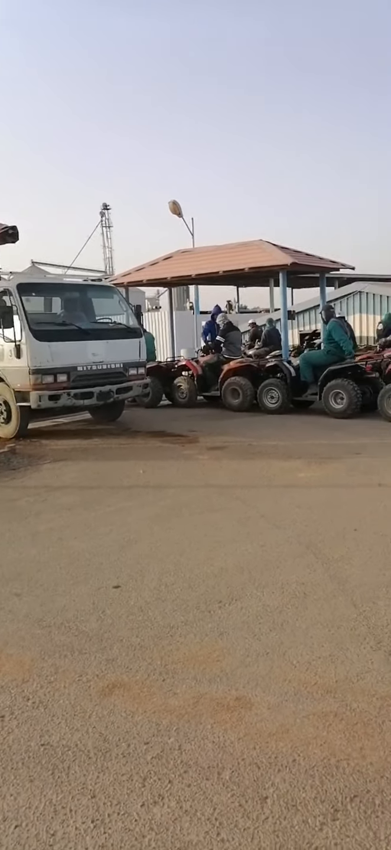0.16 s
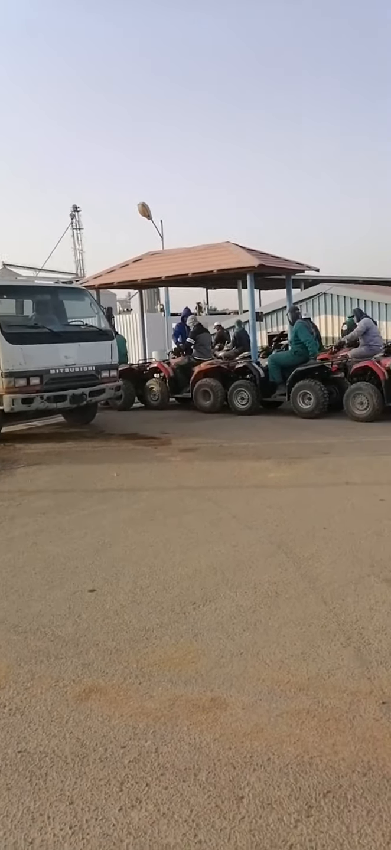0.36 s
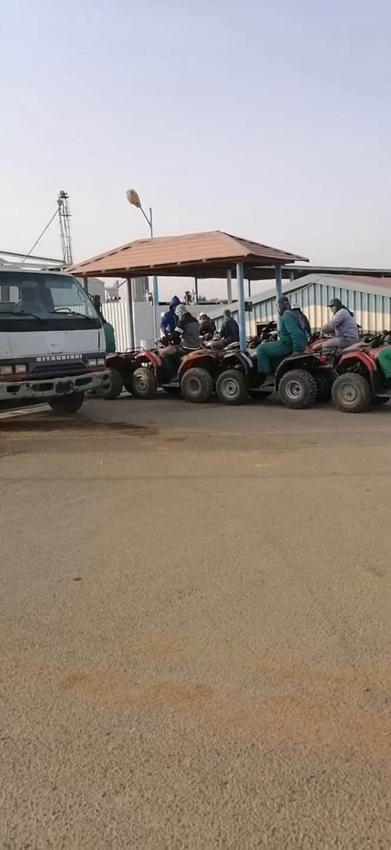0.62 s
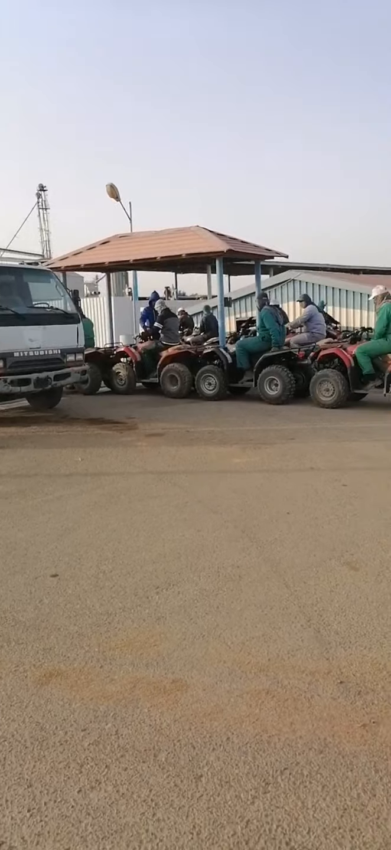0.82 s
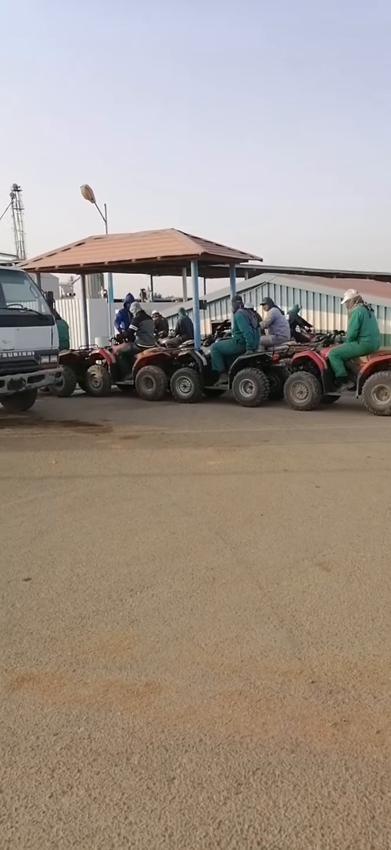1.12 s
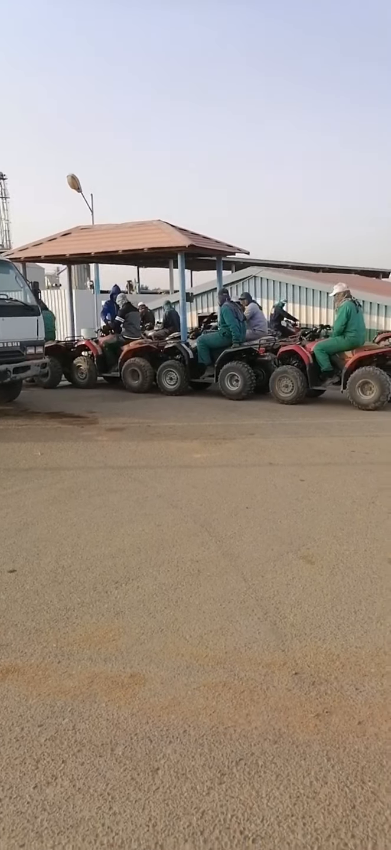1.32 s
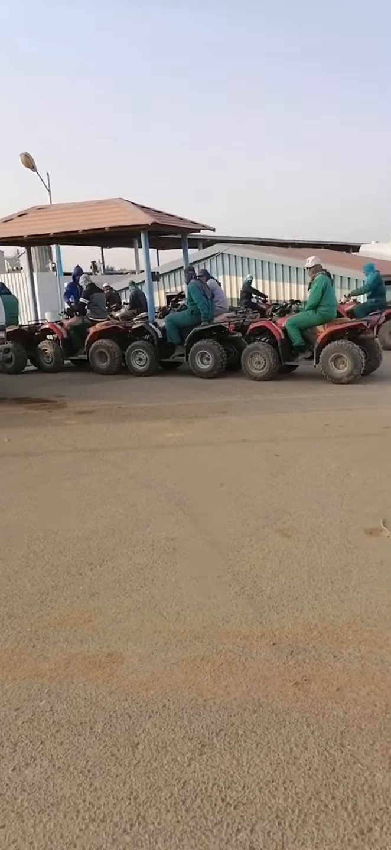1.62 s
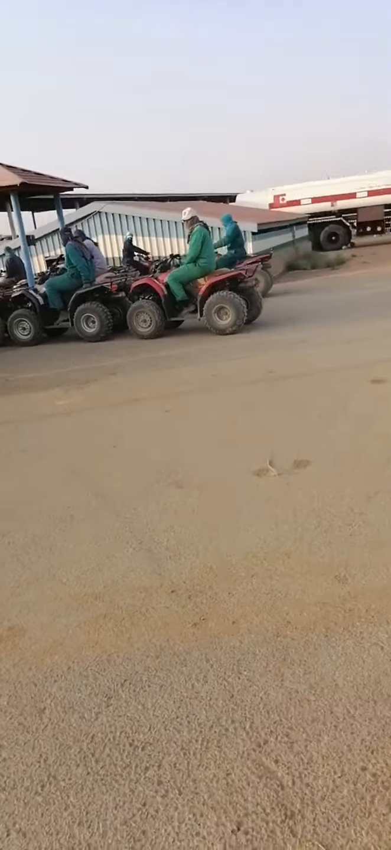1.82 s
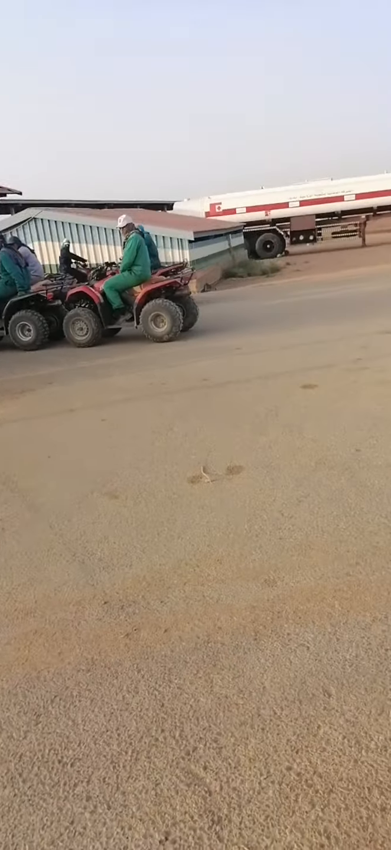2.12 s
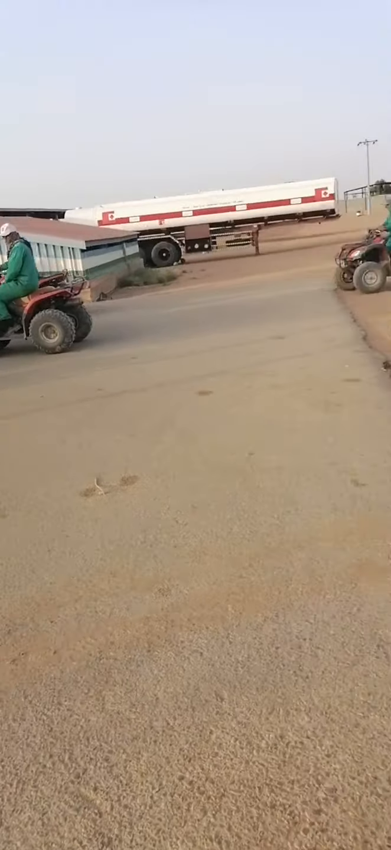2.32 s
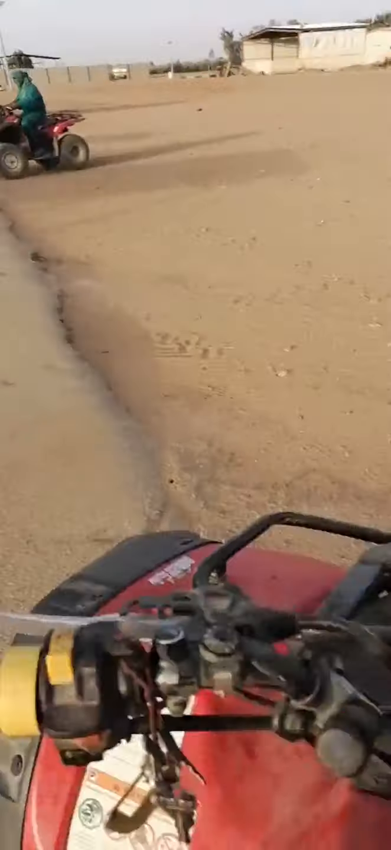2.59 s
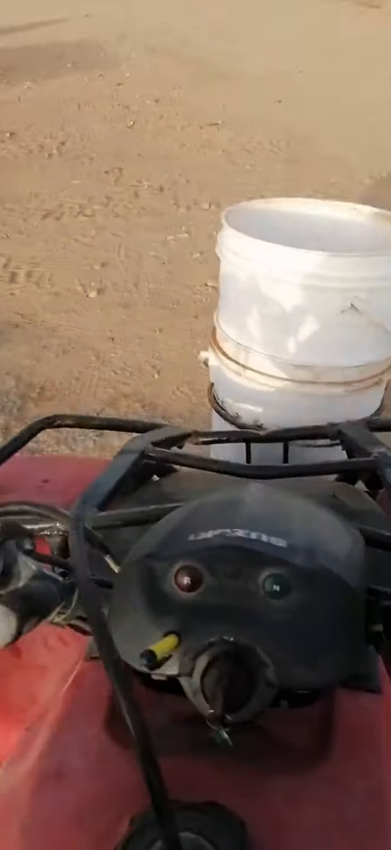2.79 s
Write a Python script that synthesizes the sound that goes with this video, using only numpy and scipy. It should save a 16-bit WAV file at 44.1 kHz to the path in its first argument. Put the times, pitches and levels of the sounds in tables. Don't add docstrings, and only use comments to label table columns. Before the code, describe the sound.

Close single-cylinder quad engine in an open yard: low rapid exhaust putter with valve chirps, a sagging lumpy idle, then a stronger steady throb with loose metal jingle and tappet clatter, other engines droning faintly behind.

```python
import sys
import numpy as np
from scipy import signal
from scipy.io import wavfile

SR = 44100
rng = np.random.default_rng(int(sys.argv[2]) if len(sys.argv) > 2 else 0)


def gain_from_decibels(decibels):
    exponent = np.asarray(decibels, float) / 20
    return 10 ** exponent


def wav_record(signal):
    frames = np.transpose(np.atleast_2d(signal))
    bounded = np.clip(frames, -1, 1)
    quanta = np.round(bounded * 32767).astype(np.int16)
    wavfile.write(sys.argv[1], SR, quanta)


N = 130095
T = np.arange(N) / SR
RIGHT_LAG_S = 0.0003857

# time in seconds, blow strength in dB, gas warmth as a pitch factor.
THROTTLE = [(0, -21, 0.99), (.3, -20.5, 1.085), (.75, -21.5, 1.016), (1.03, -24, 0.9), (1.1, -28.5, 0.84),
            (1.28, -31, 0.9), (1.4, -24.5, 0.85), (1.6, -30, 0.82), (1.7, -28.5, 1.04), (1.8, -21.5, 0.9),
            (1.92, -22, 0.986), (2.15, -19, 0.964), (2.5, -17, 1.015), (2.63, -17.5, 0.98),
            (2.95, -14.5, 1.017)]
# pitch in Hz, level in dB, t60 in seconds.
CRANKCASE = [(1920, 1, 0.022), (2174, -3.5, 0.028), (2880, -7.5, 0.015), (3335, -5, 0.02),
             (3880, -6, 0.011)]
# pitch in Hz, difference in dB.
LEFT_OVER_RIGHT_DB = [(40, -3.5), (380, 4.5), (1290, 1.5), (2380, 2.5), (4000, 0), (5500, 7.5), (8120, 5),
                      (15000, 16)]


def in_time(rows):
    s, *columns = np.transpose(rows)
    return [np.interp(T, s, c) for c in columns]


def at_hz(points, hz):
    table_hz, value = np.transpose(points)
    return np.interp(np.log(hz), np.log(table_hz), value)


def rms_one(x):
    return x / np.sqrt(np.mean(x ** 2) + 1e-20)


def drift(rate):
    r = np.exp(-80 * np.pi * rate / SR)
    slow = signal.lfilter([1], [1, -2 * r, r * r], rng.standard_normal(N // 40 + 2002))[2000:]
    return np.interp(np.arange(N) / 40, np.arange(len(slow)), rms_one(slow))


def ring(clicks, hz, t60):
    r, w = gain_from_decibels(-60 / (t60 * SR)), 2 * np.pi * hz / SR
    return signal.lfilter([0, np.sin(w)], [1, -2 * r * np.cos(w), r * r], clicks + 1e-18)


def band(x, low_hz, high_hz, order):
    return signal.sosfilt(signal.butter(order, [low_hz, high_hz], "band", fs=SR, output="sos"), x)


def place(x, hz):
    tilt_db = at_hz(LEFT_OVER_RIGHT_DB, hz) / 2
    late = np.interp(T - RIGHT_LAG_S, T, x)
    return np.array([gain_from_decibels(tilt_db) * x, gain_from_decibels(-tilt_db) * late])


def banded_noise(spectrum, patchy_db, per_octave):
    # pitch in Hz, left-right likeness from 0 to 1.
    likeness = [(30, .2), (100, 1), (500, 0.77), (950, 0.079), (5000, 0.013), (15000, 0.02)]
    out, together, lag = 0, drift(2.13), int(RIGHT_LAG_S * SR)
    lowest, highest = spectrum[0][0], spectrum[-1][0]
    edges = lowest * 2 ** np.arange(0, np.log2(highest / lowest) + .1, 1 / per_octave)
    white = rng.standard_normal((2, 2, N))
    for k, (low, high) in enumerate(zip(edges, edges[1:])):
        shared, own = band(white[k % 2], low, high, 2)
        hz = np.sqrt(low * high)
        alike = np.clip(at_hz(likeness, hz), 0, 1)
        tilt_db = at_hz(LEFT_OVER_RIGHT_DB, hz) / 2
        gain = gain_from_decibels(at_hz(spectrum, hz) + patchy_db * (0.5 * together + drift(29.0)))
        right = np.sqrt(alike) * np.roll(shared, lag) + np.sqrt(1 - alike) * own
        out = out + gain * np.array([gain_from_decibels(tilt_db) * shared, gain_from_decibels(-tilt_db) * right])
    return rms_one(out)


def crank():
    # time in seconds, firings per second.
    firing_speed = [(0.0, 17.295), (0.28, 18.931), (0.6, 18.64), (0.8, 16.211), (1.0, 13.859),
                    (1.15, 11.875), (1.3, 10.118), (1.45, 10.105), (1.6, 8.485), (1.68, 11.246),
                    (1.74, 13.191), (1.86, 15.167), (2.0, 16.242), (2.15, 16.595), (2.4, 16.685),
                    (2.6, 17.365), (2.95, 17.597)]
    first_s = -.0059
    rate, = in_time(firing_speed)
    turns = np.cumsum(rate) / SR - first_s * rate[0]
    count = np.arange(1, int(turns[-1]) + 1)
    return turns, np.r_[first_s, np.interp(count, turns, T)]


def throb(turns, at, depth_db):
    return gain_from_decibels(depth_db * (np.cos(2 * np.pi * (turns - at)) - 1.5))


def exhaust(firings):
    # pitch in Hz, left level in dB, right level in dB, rise in cycles, hold in seconds, t60 in seconds,
    # delay in seconds, share of the throttle followed, spread from firing to firing in dB.
    chambers = [(98, -13, -20, 2.09, 0.021, 0.13, 0.00055, 0.4, 1.5),
                (272.9, -14, -24.5, 0.97, 0.017, 0.04, 0.003115, 0.95, 1.1),
                (209.6, -29, -35.5, 1.3, 0.0087, 0.11, 0.003, 0.41, 5),
                (458.7, -34.5, -48, 1, 0.011, 0.077, 0.00304, 0.64, 5.5),
                (343.5, -31, -43, 1.04, 0.0095, 0.074, 0.0037, 0.68, 4),
                (45.8, -35.5, -39, 1.4, 0.018, 0.31, 0.00054, 0.29, 3.5),
                (103.5, -27, -32.5, 1.34, 0.023, 0.13, 0.03066, 0.32, 4.5),
                (288, -33, -43, 2, 0.016, 0.043, .027, 0.78, 4)]
    early_cycles = 0.46
    s, load_db, warmth = np.transpose(THROTTLE)
    pad, span = SR // 10, np.arange(SR // 5)
    out = np.zeros((2, N + SR))
    luck = rng.standard_normal((len(firings), len(chambers), 2))
    for at, draws in zip(firings, luck):
        start = int(at * SR) - pad // 10
        blow_db, warm = np.interp(at, s, load_db) + 17, np.interp(at, s, warmth)
        for chamber, (level_luck, pitch_luck) in zip(chambers, draws):
            hz, left_db, right_db, cycles, hold, t60, delay, follows, spread_db = chamber
            level_db = follows * blow_db + spread_db * level_luck
            pitch = hz * warm * (1 + 0.0064 * spread_db * pitch_luck)
            glide_per_s = 2.5 if hz > 250 else -1.5
            for side, db in enumerate((left_db, right_db)):
                t = (start + span) / SR - at - delay - side * RIGHT_LAG_S
                rise = np.sin(np.pi / 2 * np.clip((t * hz + early_cycles) / cycles, 0, 1)) ** 2
                fall_db = -60 * np.maximum(t - hold, 0) / t60
                bend = 1 + glide_per_s * np.clip(t - hold, -hold, .06) / 2
                tone = np.sin(2 * np.pi * pitch * t * bend)
                out[side, pad + start + span] += gain_from_decibels(db + level_db + fall_db) * rise * tone
    return out[:, pad:pad + N]


def valve():
    # time in seconds, peak in dB.
    leaks = [(0.011, -37.5), (0.0686, -35), (0.1245, -38), (0.1789, -38), (0.2332, -38), (0.2856, -35),
             (0.3395, -35), (0.393, -36), (0.4292, -40), (0.4459, -38), (0.4987, -34.5), (0.552, -38),
             (0.6057, -34), (0.6608, -32.5), (0.7167, -35), (0.7755, -38), (0.8369, -43), (0.9017, -47),
             (0.9696, -43), (1.043, -40.5), (1.1203, -50), (1.203, -41.5), (1.2946, -46), (1.3622, -44),
             (1.3934, -37), (1.495, -44), (1.6007, -48), (1.7019, -41), (1.7608, -44), (1.8532, -42),
             (2.4069, -51), (2.5814, -44), (2.6334, -45), (2.8155, -49)]
    # pitch in Hz, level in dB, t60 in seconds.
    whistles = [(5390, 0, .012), (5910, -10, .006), (7070, -7, .004), (8000, -17, .003)]
    hold_s, tail_s, tail_db = 0.0043, 0.012, -9.5
    puff = np.zeros(N)
    for s, db in leaks:
        part = slice(int(s * SR) - 50, int(s * SR) + SR // 8)
        since = np.maximum(T[part] - s + .001, 0)
        opening = np.clip(since / 0.001, 0, 1)
        closing = np.exp(-(since / hold_s) ** 2) + gain_from_decibels(tail_db) * np.exp(-since / tail_s)
        puff[part] += gain_from_decibels(db - 0.5) * opening * closing
    out = 0
    for hz, db, t60 in whistles:
        rough = 1 + .25 * drift(250)
        even = 2 * (1 - gain_from_decibels(-60 / (t60 * SR)))
        whistle = np.sin(2 * np.pi * hz * T + 1.45 * drift(9.4))
        out = out + place(gain_from_decibels(db) * even * ring(puff * rough * whistle, hz, t60), hz)
    return out


def engine_hiss(turns, near_db):
    # pitch in Hz, level in dB per Hz.
    hiss_bands = [(4300, -21), (4800, -27), (5300, 1.5), (6200, -2), (7100, 3), (8000, -8.5), (9000, -11.5),
                  (11000, -21.5)]
    gain = gain_from_decibels(near_db + 5) * throb(turns, 0.32, 1.5)
    return gain * banded_noise(hiss_bands, patchy_db=2.5, per_octave=4.86)


def grit_sizzle(grit_db):
    # pitch in Hz, level in dB per Hz.
    sizzle_bands = [(8800, -1), (10000, 0.5), (11200, -16.5), (13000, -8), (14300, -1.5), (15900, -1.5)]
    return gain_from_decibels(grit_db) * banded_noise(sizzle_bands, patchy_db=6.0, per_octave=7.24)


def clatter(turns, engine_db):
    struck = rng.random(N) < 1200 / SR
    ticks = struck * gain_from_decibels(4.8 * np.minimum(rng.exponential(1, N), 3.5)) * rng.choice([-1, 1], N)
    ticks = ticks * throb(turns, 0.43, 3)
    out = 0
    for hz, db, t60 in CRANKCASE:
        twin = ring(ticks, 1.03 * hz, t60) * np.array([[.7], [.5]])
        out = out + gain_from_decibels(db) * (place(ring(ticks, hz, t60), hz) + twin)
    return gain_from_decibels(engine_db) * rms_one(out)


def roar(turns, effort_db):
    # pitch in Hz, level in dB per Hz.
    fan_bands = [(450, -8.5), (800, -2), (1200, -7.5), (1600, -8.5), (2400, -10), (3200, -14.5),
                 (3800, -19.5), (4600, -21.5)]
    gain = gain_from_decibels(-42.5 + 0.42 * effort_db) * throb(turns, 0.22, 1.75)
    return gain * banded_noise(fan_bands, patchy_db=1.5, per_octave=3.005)


def low_drone(turns, effort_db):
    # pitch in Hz, level in dB per Hz.
    drone_bands = [(25, -25), (50, -22.5), (100, 3), (155, -10.5), (270, -9), (420, -18.5), (700, -28)]
    gain = gain_from_decibels(-30 + 0.38 * effort_db) * throb(turns, 0.1, 0.25)
    return gain * banded_noise(drone_bands, patchy_db=1.5, per_octave=3)


def wind():
    low = band(rng.standard_normal((2, N + SR)), 22, 48, 4)[:, SR:]
    return gain_from_decibels(-45 + 1.6 * drift(4.0)) * rms_one(low) * gain_from_decibels(np.array([[1.5], [-1.5]]))


def crunches():
    # start in seconds, length in seconds, peak in dB, lowest Hz, highest Hz.
    burst_events = [(1.322, 0.018, -39.5, 1700, 4000), (1.322, 0.017, -39.5, 4430, 7400),
                    (1.330, 0.017, -40, 6200, 7400), (1.331, .006, -55, 8500, 13000),
                    (1.708, .016, -43, 5100, 6900), (1.7193, 0.011, -36, 5200, 7500),
                    (1.4, .008, -50, 2000, 3800), (1.719, .008, -61, 8500, 15000),
                    (1.437, .002, -53, 6500, 15500), (1.983, .004, -53, 11000, 18000),
                    (1.363, 0.013, -54, 13400, 14100), (1.887, 0.016, -41.5, 440, 800),
                    (1.95, 0.022, -37.5, 560, 920), (2.016, 0.015, -32, 470, 1370),
                    (1.769, 0.015, -45.5, 1600, 3800), (1.841, 0.016, -45, 1500, 5800),
                    (1.905, .02, -47, 1800, 5500), (2.031, .02, -44, 1500, 3500),
                    (1.681, .025, -54, 1950, 2500), (1.508, 0.02, -46.5, 1700, 1900),
                    (.607, .005, -56, 6000, 13000), (1.15, 0.018, -47, 770, 880)]
    out, t = 0, T[:SR // 5]
    for s, length, db, low_hz, high_hz in burst_events:
        rise = np.clip(t / (0.055 * length), 0, 1)
        fall = gain_from_decibels(-15 * np.clip(t / length, 0, 20) ** 2)
        burst = band(rng.standard_normal(len(t)) * rise * fall + 1e-18, low_hz, high_hz, 4)
        burst = np.r_[np.zeros(int(s * SR)), burst, np.zeros(N)][:N]
        out = out + place(gain_from_decibels(db + 8) * burst / np.abs(burst).max(), np.sqrt(low_hz * high_hz))
    return out


def jingle():
    # time in seconds, peak in dB.
    touches = [(1.821, -49), (1.9819, -63), (2.0143, -61), (2.0474, -46), (2.1041, -54), (2.1311, -43),
               (2.1685, -53), (2.193, -42.5), (2.2425, -40.5), (2.2872, -44), (2.3206, -45), (2.351, -46),
               (2.373, -62), (2.4094, -47), (2.4918, -64), (2.5382, -52), (2.61, -65), (2.7023, -55.5),
               (2.7941, -62), (2.847, -61), (2.87, -42.5), (2.9003, -48)]
    # pitch in Hz, level in dB, t60 in seconds.
    buckle_modes = [(9640, 0, .04), (13780, -6, .035), (14600, -10, .03), (15300, -9, .025),
                    (10900, -13, .015)]
    s, db = np.transpose(touches)
    luck, out = rng.standard_normal((len(s), len(buckle_modes))), 0
    shaking = (T > 1.95) * (T < 2.56) * gain_from_decibels(-62.5 + 3.7 * drift(13.0))
    for (hz, mode_db, t60), draws in zip(buckle_modes, luck.T):
        clicks = shaking * (rng.random(N) < 260 / SR) * rng.standard_normal(N)
        clicks[(s * SR).astype(int)] = gain_from_decibels(db + 1.0 + 2.2 * draws)
        pair = ring(clicks, hz, t60) + ring(clicks, 1.006 * hz, t60)
        out = out + place(gain_from_decibels(mode_db) * pair / 2, hz)
    return out


def squeaks():
    # start in seconds, length in seconds, peak in dB, first Hz, last Hz.
    far_squeaks = [
        (1.827, 0.051, -49.5, 1240, 1213),
        (2.019, 0.076, -45, 1030, 1154),
    ]
    out = 0
    for s, length, db, from_hz, to_hz in far_squeaks:
        along = np.clip((T - s) / length, 0, 1)
        hz = from_hz + (to_hz - from_hz) * along
        out = out + gain_from_decibels(db) * np.sin(np.pi * along) * np.sin(2 * np.pi * np.cumsum(hz) / SR)
    return out


def knocks():
    # time in seconds, peak in dB, upper modes in dB.
    tappet_knocks = [(2.3147, -46, -14), (2.3366, -40, -16), (2.4015, -41, -17), (2.4509, -41, -12),
                     (2.5113, -39, -11), (2.5322, -35.5, -3), (2.5904, -34, -16), (2.6474, -36, -21),
                     (2.6995, -37, -22), (2.7053, -31, -25), (2.7477, -39, -18), (2.7615, -37, -19),
                     (2.805, -39, -9), (2.819, -27.5, -10), (2.8629, -29, -9.5), (2.8769, -25, -6.5),
                     (2.9174, -35, -15), (2.9318, -30, -9)]
    rebound_s, rebound_db = .009, -5
    s, db, upper_db = np.transpose(tappet_knocks)
    luck, out = rng.standard_normal((len(s), len(CRANKCASE), 2)), 0
    for k, (hz, mode_db, t60) in enumerate(CRANKCASE):
        clicks = np.zeros(N + SR)
        level_db = db - 5 + mode_db + (upper_db + 12.5) * (k > 1)
        clicks[(s * SR).astype(int)] = gain_from_decibels(level_db + 2.4 * luck[:, k, 0])
        clicks[((s + rebound_s) * SR).astype(int)] = gain_from_decibels(level_db + rebound_db + 3.3 * luck[:, k, 1])
        out = out + place(ring(clicks[:N], hz, t60), hz)
    return out


def scene():
    # time in seconds, exhaust side in dB, engine side in dB, dry grit in dB.
    facing = [(0, -44.5, -53.5, -43), (.17, -47, -50.5, -51), (.3, -49, -57, -69), (.7, -48, -56, -55),
              (.95, -53.5, -63, -62), (1.15, -55, -65, -74), (1.6, -55, -63, -71), (1.85, -54, -83, -77),
              (2.0, -50.5, -60, -61), (2.4, -50.5, -55.5, -59), (2.6, -51.5, -50.5, -65.5),
              (2.95, -54, -40.5, -64)]
    turns, firings = crank()
    near_db, engine_db, grit_db = in_time(facing)
    effort_db = in_time(THROTTLE)[0] + 20
    bike = exhaust(firings) + valve() + engine_hiss(turns, near_db) + clatter(turns, engine_db)
    bike = bike + roar(turns, effort_db) + jingle() + knocks()
    around = grit_sizzle(grit_db) + low_drone(turns, effort_db) + wind() + crunches() + squeaks()
    return bike + around


def low_pass(x):
    return signal.sosfilt(signal.butter(12, 16160, fs=SR, output="sos"), x)


def record(dry):
    cut = signal.sosfilt(signal.cheby2(20, 60, 15900, fs=SR, output="sos"), dry)
    return low_pass(cut)


dry = scene()
out = record(dry)
wav_record(out)
```